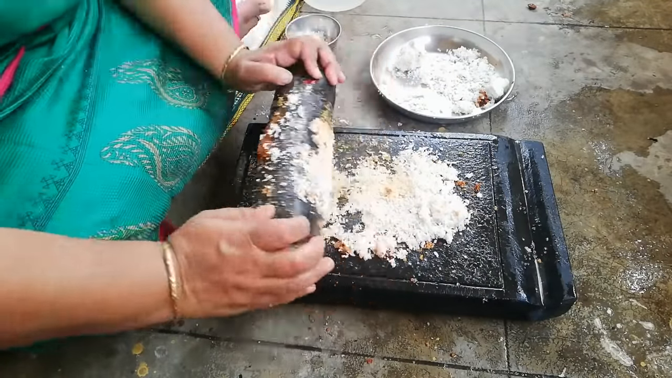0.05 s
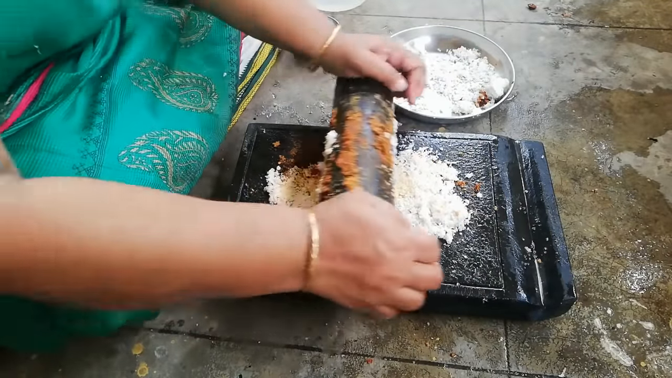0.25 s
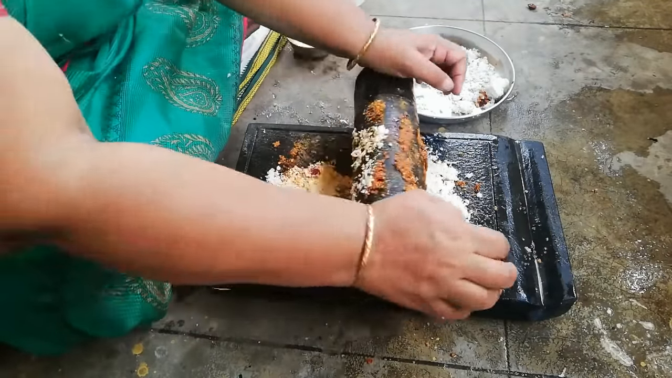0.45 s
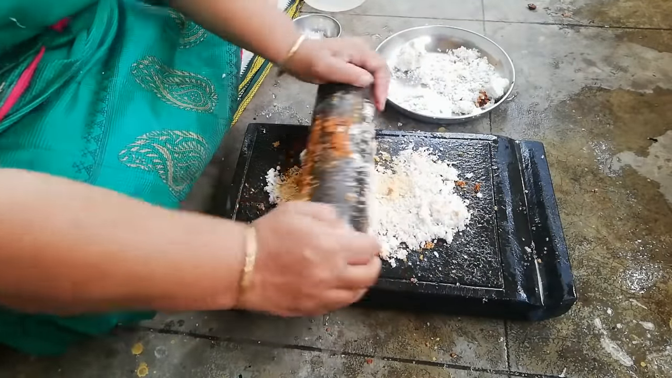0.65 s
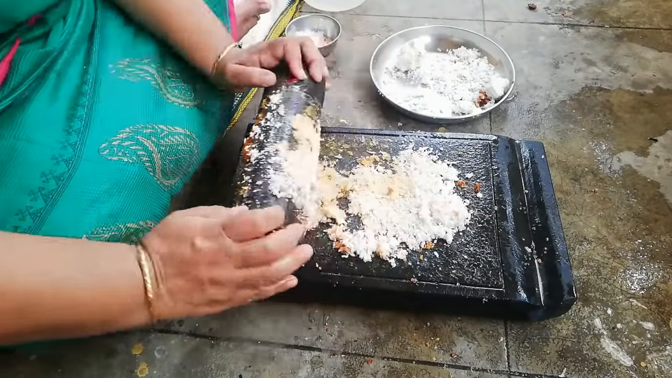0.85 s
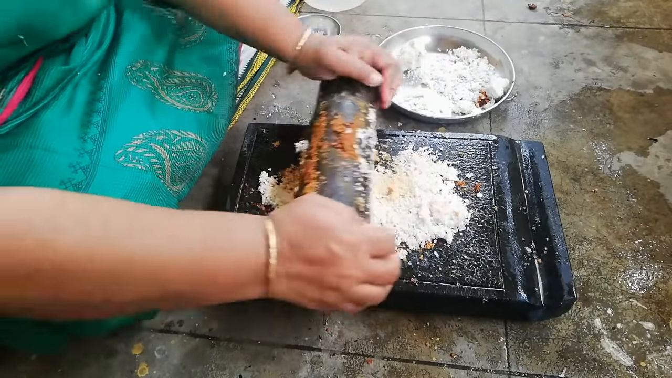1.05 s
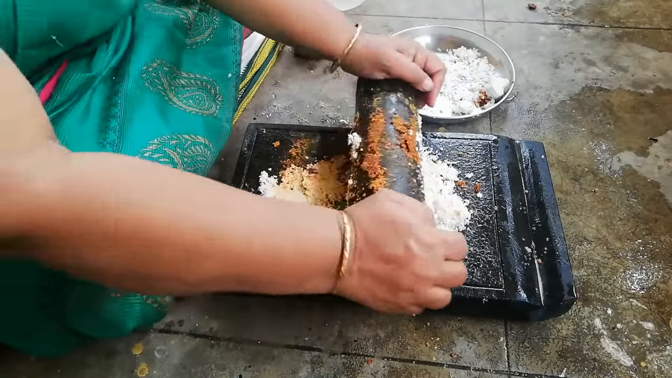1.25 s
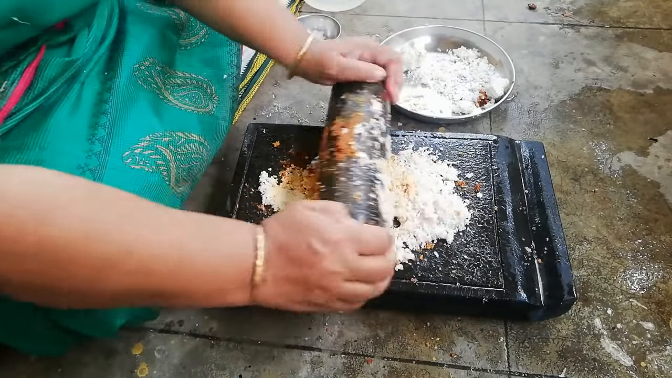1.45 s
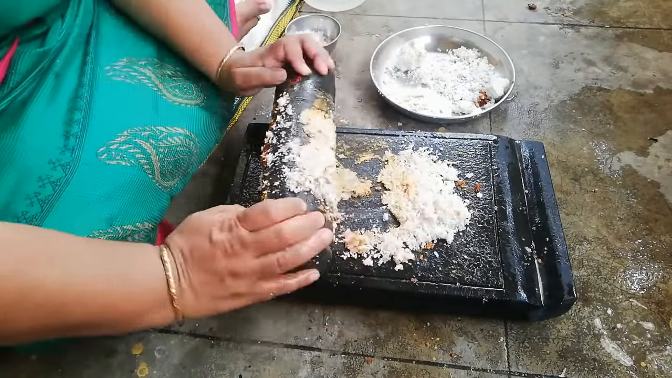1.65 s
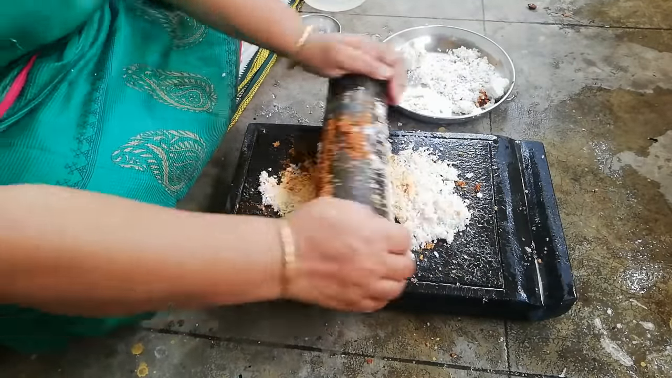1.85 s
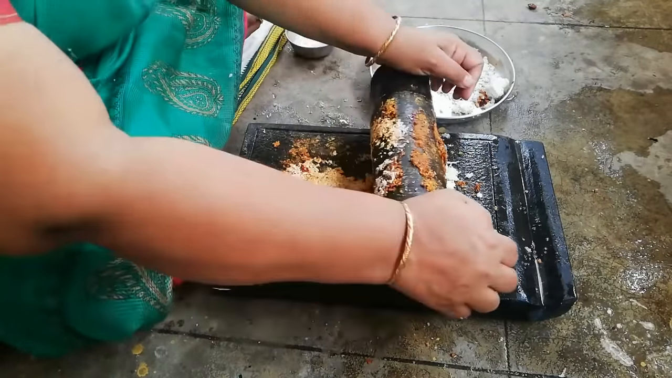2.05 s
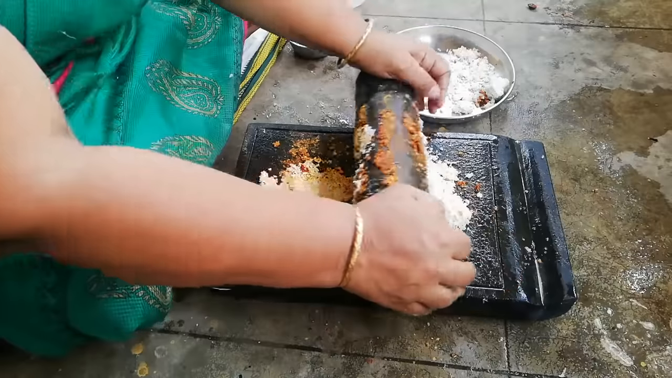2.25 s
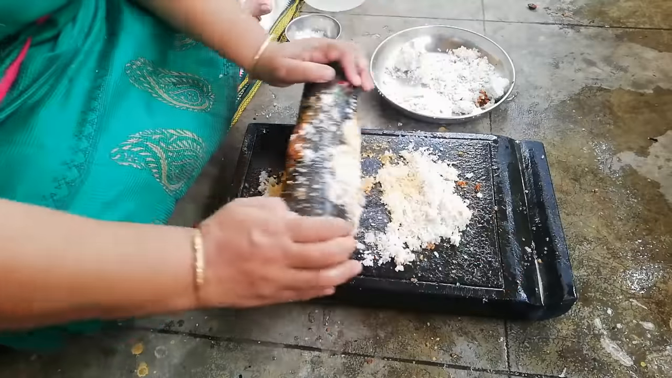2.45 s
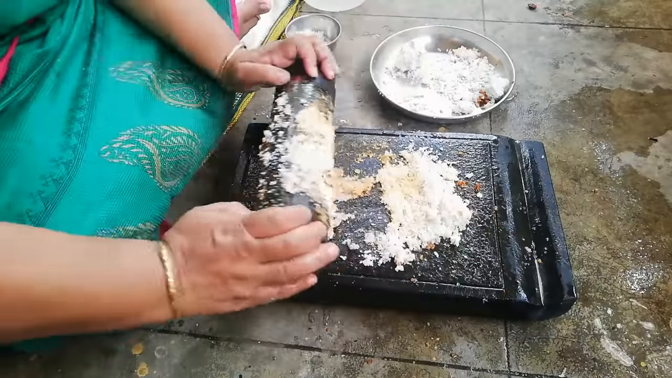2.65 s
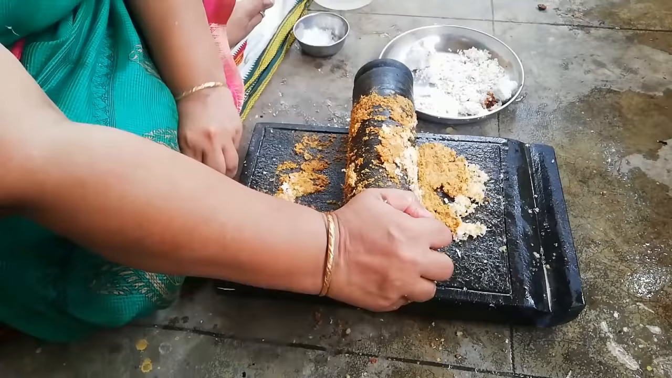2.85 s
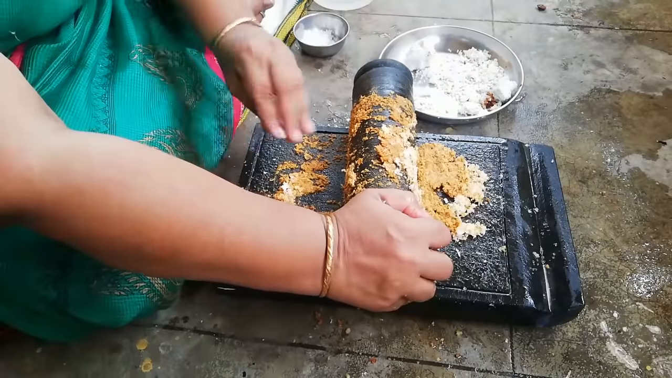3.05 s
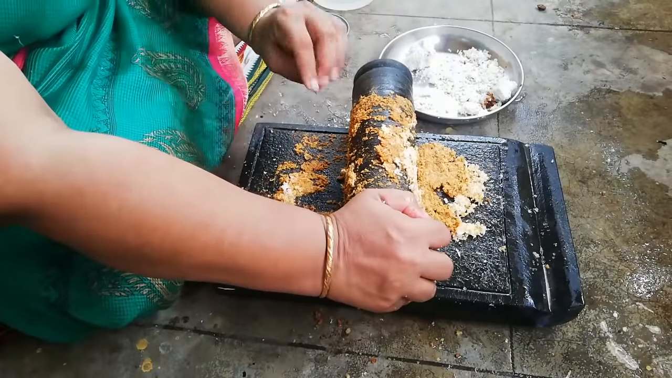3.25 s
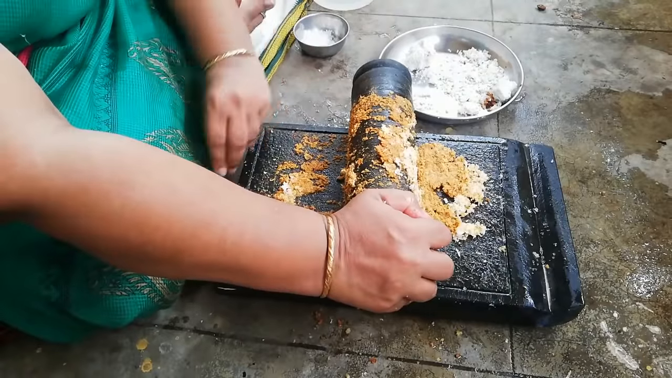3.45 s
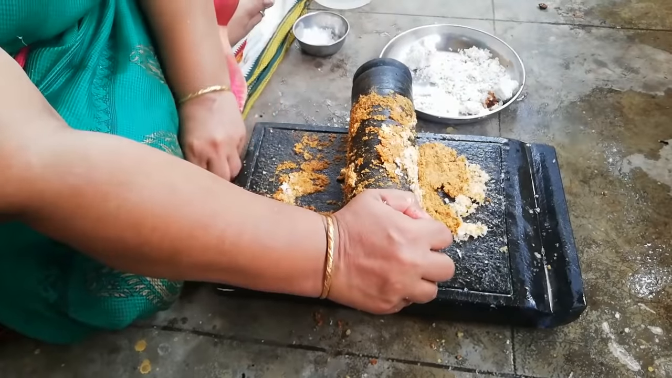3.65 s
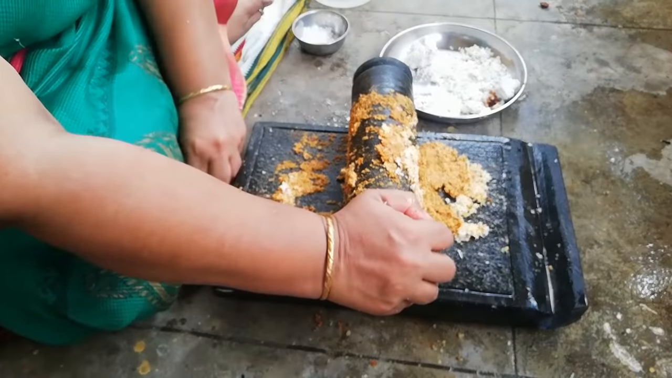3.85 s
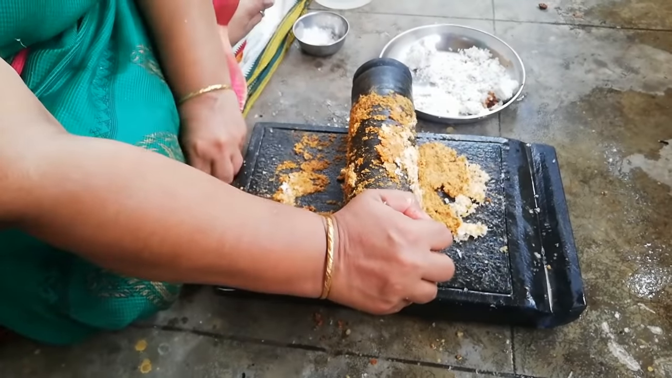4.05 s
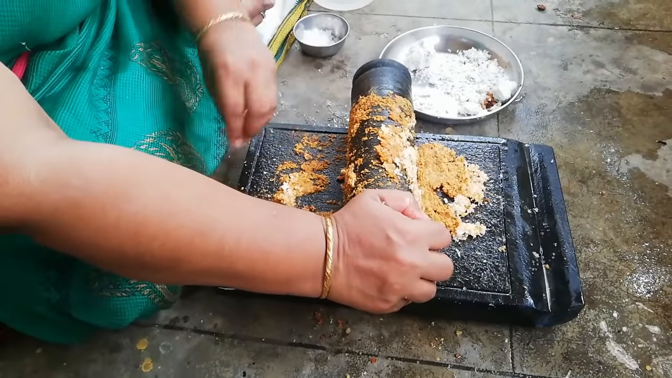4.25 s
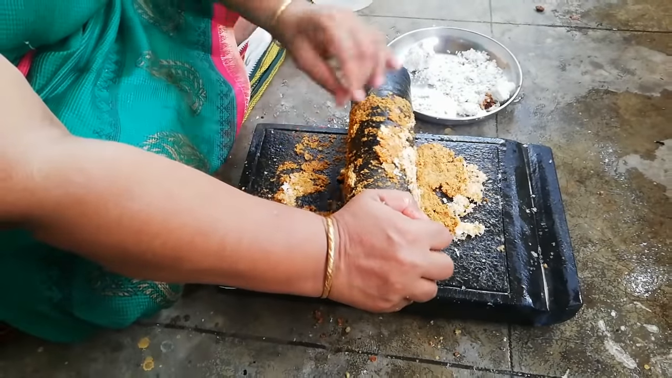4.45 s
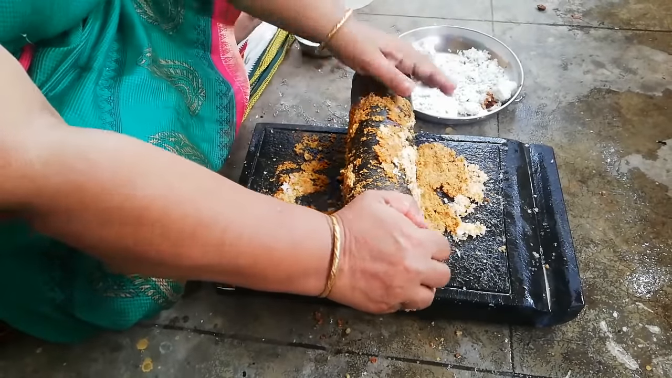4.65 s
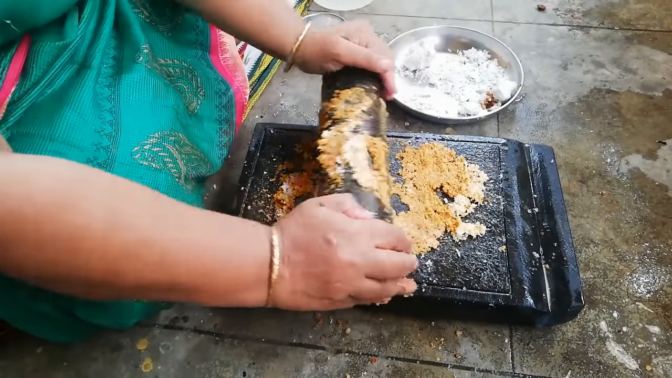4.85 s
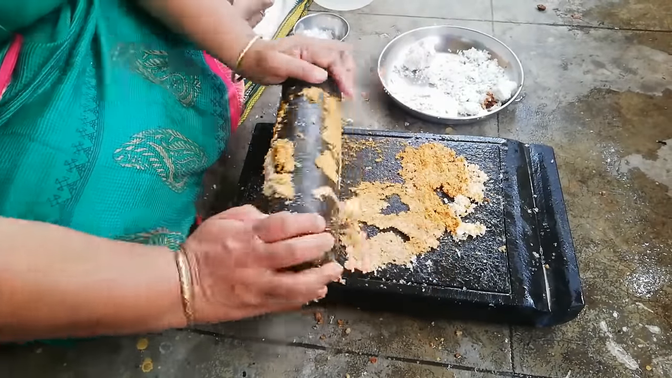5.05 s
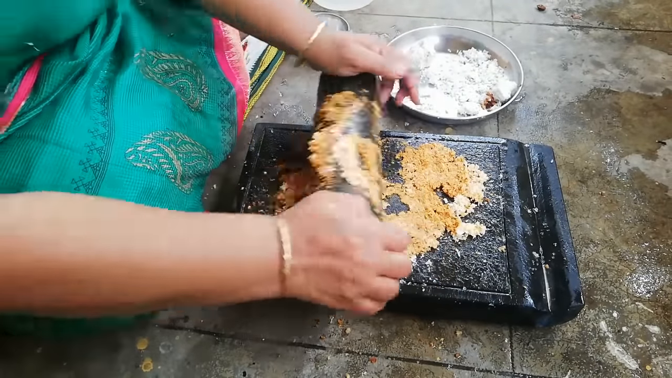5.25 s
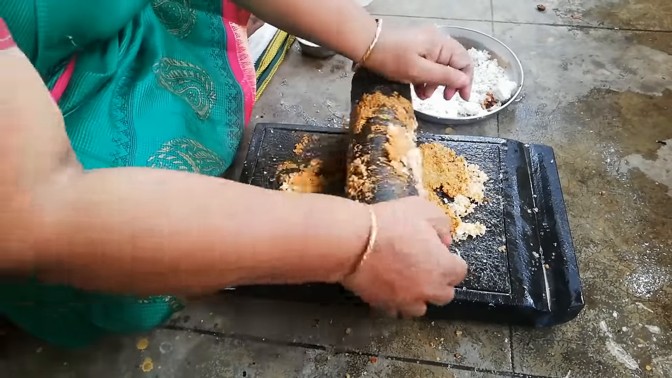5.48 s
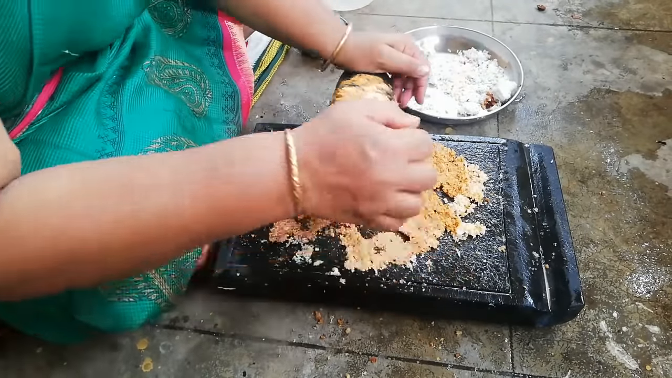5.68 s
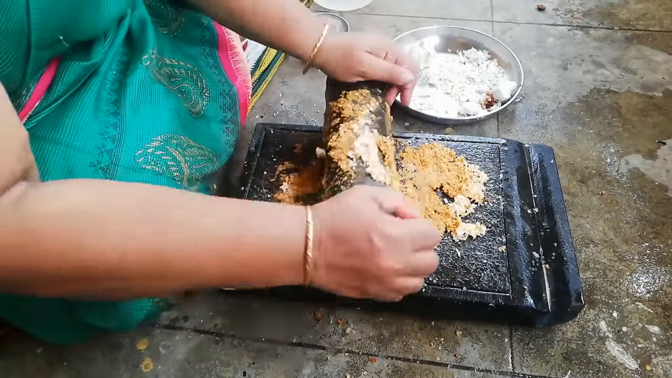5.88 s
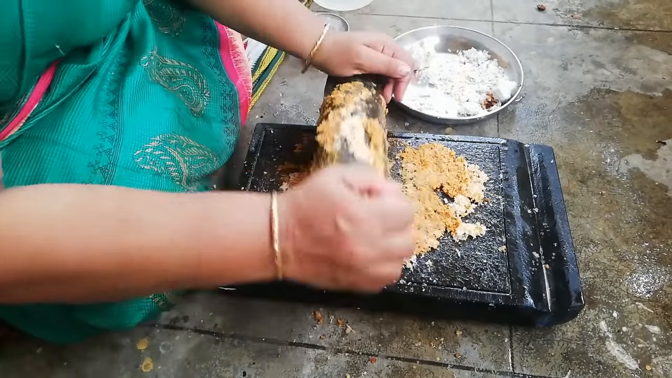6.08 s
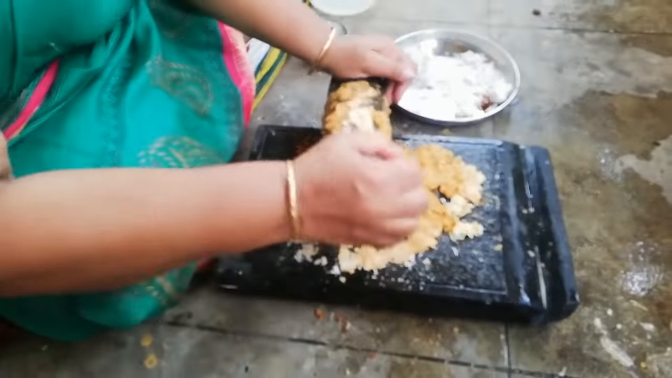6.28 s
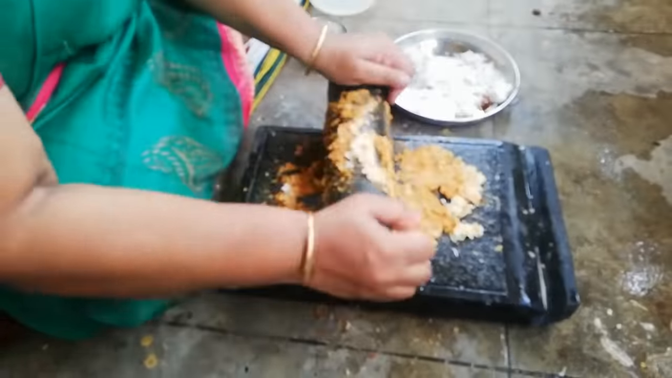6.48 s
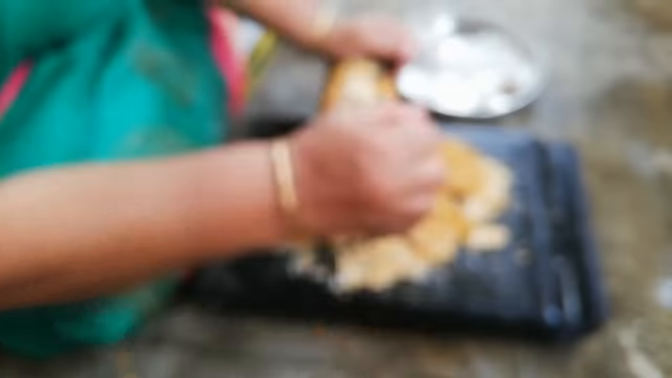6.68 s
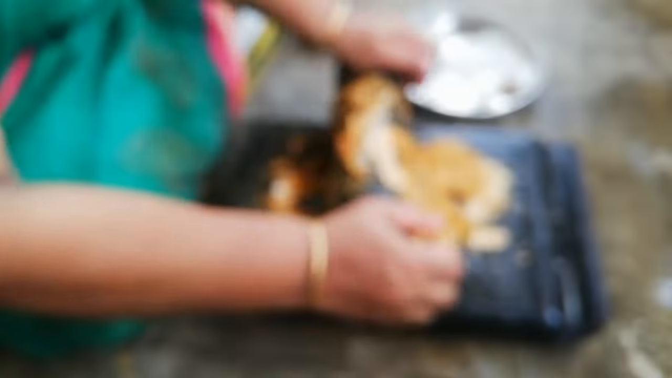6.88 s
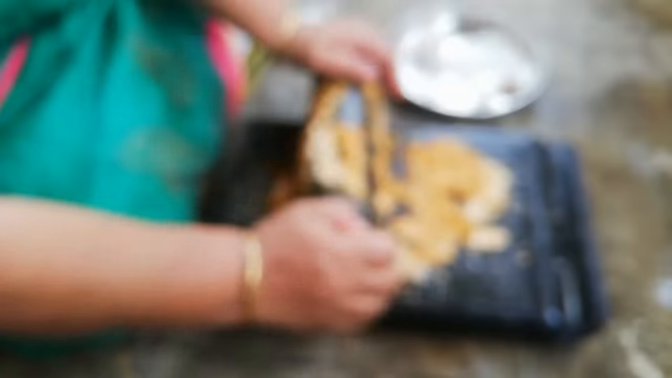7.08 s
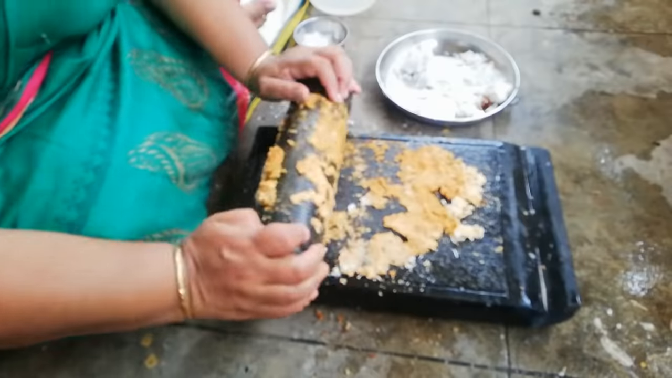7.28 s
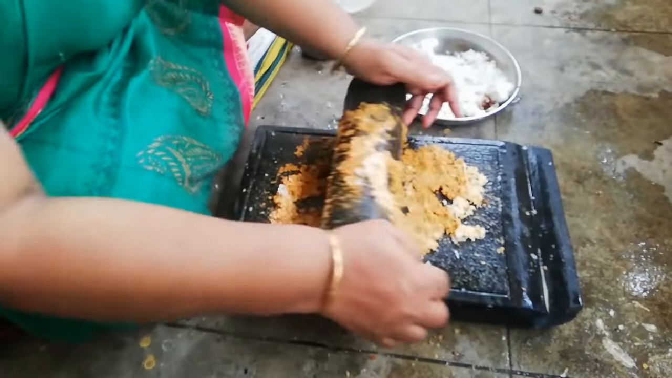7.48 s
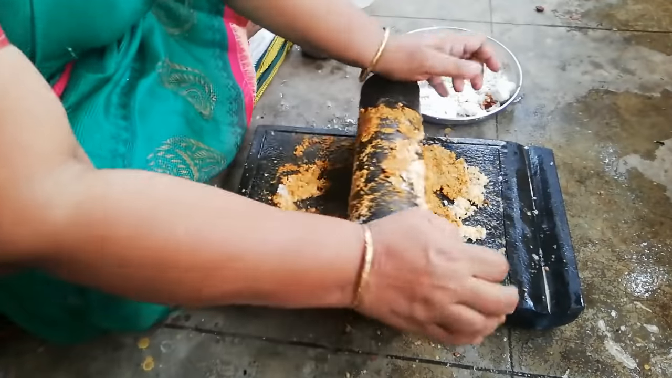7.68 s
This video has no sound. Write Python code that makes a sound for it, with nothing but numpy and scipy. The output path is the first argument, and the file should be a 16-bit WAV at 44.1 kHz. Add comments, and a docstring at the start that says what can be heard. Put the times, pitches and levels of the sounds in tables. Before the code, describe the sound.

A close stereo microphone in a small hard kitchen catches a stone roller working moist coconut pulp on a stone slab, nearer the right. From 0 to 2.8 seconds, quiet gritty crunches come and go with each stroke; a hard stone clack lands at 0.3, a rough ringing scrape at 1.1 to 1.2, and lighter knocks near 2.4, over soft low rumbles. From about 2.9 to 4.7 the grinding stops, leaving steady airy noise and a wavering low motor hum, with one tiny tick around 4. Wet, brighter crunching resumes near 4.9. The roller thumps down at 5.8 and 6.2 with bassy thuds and pulp splats, then much harder at 6.5 and 6.8, clacking, ringing and booming. A brittle double crack snaps on the left at 6.7. Softer crunches and small scrapes continue to about 7.7.

```python
"""Coconut paste crunches as a stone roller is pushed to and fro over a stone slab on a kitchen floor.
Bare stone scrapes and rings the roller; it is thumped down four times; a brittle piece cracks.
Random clicks make crunch and scrape; dying modes make stone and the bass boom of the small hard room.
Steady noise and wavering tones make the kitchen air and a motor's hum. The slab is nearer the right port."""
import sys
import numpy as np
from scipy import signal
from scipy.fft import rfft, irfft, next_fast_len
from scipy.io import wavfile
from scipy.ndimage import uniform_filter1d

SR = 44100
rng = np.random.default_rng(int(sys.argv[2]) if len(sys.argv) > 2 else 0)


def wav_record(signal):
    """Record a signal, one row per channel, as 16-bit PCM in the file named by sys.argv[1]."""
    frames = np.transpose(np.atleast_2d(signal))
    bounded = np.clip(frames, -1, 1)
    # unit amplitude maps onto the largest positive 16-bit level
    quanta = np.round(bounded * 32767).astype(np.int16)
    wavfile.write(sys.argv[1], SR, quanta)


N = 340440  # samples


def amp(db):
    """Decibels to gain."""
    return 10 ** (np.asarray(db) / 20)


def evened(x):
    """Scales to rms 1."""
    return x / np.sqrt(np.mean(x ** 2) + 1e-20)


def read(points, hz):
    """Reads a table on a log-frequency axis."""
    f, value = np.transpose(points)
    return np.interp(np.log(hz + 1), np.log(f + 1), value)


def add(mix, s, sound):
    """Mixes a sound in at a time."""
    part = mix[round(s * SR):][:len(sound)]
    part += sound[:len(part)]


def coloured(x, points, share=1):
    """Filters by a table of dB, scaled by share."""
    length = x.shape[-1]
    size = next_fast_len(length)
    gain = amp(share * read(points, np.fft.rfftfreq(size, 1 / SR)))
    return irfft(rfft(x, size) * gain, size)[..., :length]


def ring(modes, seconds):
    """Impulse response of exponentially dying modes, peak 1."""
    t = np.arange(round(seconds * SR)) / SR
    out = sum(sign * amp(db - 60 * t / t60) * np.sin(2 * np.pi * hz * t) for hz, db, t60, sign in modes)
    return out / abs(out).max()


def grit(per_s, spread_db):
    """Random clicks of both signs, a few large, rms 1."""
    size = amp(spread_db * np.minimum(rng.exponential(1, N), 4))
    sign = rng.choice([-1., 1.], N)
    return evened(size * sign * (rng.random(N) < per_s / SR))


def swells(rows):
    """Power sum of swells, each rising to its peak and falling away evenly in dB."""
    t, power = np.arange(0, N + 64, 64) / SR, 0
    for s, rise_s, fall_s, db in rows:
        below_peak_db = 20 * np.where(t < s, (s - t) / rise_s, (t - s) / fall_s)
        power = power + amp(db - below_peak_db) ** 2
    return uniform_filter1d(np.interp(np.arange(N) / SR, t, np.sqrt(power)), 200)


# crackle colour of pulp: (frequency [Hz], level [dB])
PASTE_COLOUR = [(880, -3), (1500, -2.5), (1660, -14), (1770, -48), (1920, 1.5), (2480, -3), (3470, -2),
                (5560, 1), (6320, 4), (7400, 1.5), (10300, 3), (11800, 0), (15800, -14)]
# pulp crushed under roller: (peak time [s], rise per 20 dB [s], fall per 20 dB [s], level [dB],
#                             wetness as treble tilt [dB])
CRUNCHES = [(0.0, .05, 0.05, -50.5, -4), (0.104, 0.14, 0.13, -60.5, 2), (0.198, 0.035, 0.042, -50, 12),
            (0.245, 0.084, 0.06, -55, -6), (0.37, 0.051, 0.044, -55, 8), (0.615, 0.14, 0.094, -56.5, 3),
            (0.735, 0.047, 0.047, -57.5, -3), (0.8, 0.073, 0.079, -54, 2), (1.06, 0.059, 0.16, -63, 17),
            (1.14, 0.086, 0.15, -60, -20), (1.225, 0.46, 0.034, -49.5, -34), (1.456, .06, 0.071, -54, 2),
            (1.56, 0.072, .2, -54, 8), (1.83, 0.17, 0.22, -55.5, 24), (1.93, 0.14, 0.18, -56.5, -1),
            (2.045, .05, 0.088, -57, 2), (2.27, 0.23, 0.25, -59.5, 6), (2.42, 0.048, .1, -58.5, 11),
            (2.52, 0.14, 0.17, -57, 2.5), (2.77, 0.094, 0.067, -59, 5), (2.84, 0.21, 0.0094, -53.5, 22),
            (4.876, 0.17, 0.086, -54.5, 15), (4.995, 0.11, .12, -51, 38), (5.182, 0.11, .3, -60, 5),
            (5.282, 0.13, 0.16, -53, 25), (5.388, 0.25, 0.077, -54, 7), (5.55, .15, 0.23, -65, 14),
            (5.615, .03, .04, -62, 25), (5.915, 0.15, .08, -51, 27), (6.22, 0.1, 0.088, -48.5, 20),
            (6.53, 0.038, 0.066, -49, 6), (6.862, 0.084, 0.06, -48, -1), (7.03, 0.099, 0.24, -58.5, 2),
            (7.22, 0.21, 0.12, -51, 30), (7.361, 0.24, 0.32, -57, 2.5), (7.53, 0.23, 0.1, -52, 11),
            (7.606, .1, 0.04, -68, 8), (7.72, 0.085, .1, -60, 6)]
# roller meets slab; also played by stone() and boom(): (time [s], slab body [dB], slab edge [dB],
#   roller ring [dB], roller tick [dB], roller pings [dB], paste splat [dB],
#   splat wetness as treble tilt [dB], thud [dB])
KNOCKS = [(0.23, -70, -65, -85, -47, -42, -55, -16, -60),
          (0.281, -31, -12.5, -33.5, -59, -56, -70, -3, -32),
          (0.691, -48.5, -43, -66, -58, -62, -68, 0, -42),
          (0.725, -69, -66, -55, -58.5, -54, -47.5, -10, -50),
          (0.838, -46, -38, -44, -65, -48, -54.5, -4, -34), (1.072, -74, -59, -60, -40, -50, -59, 8, -70),
          (1.118, -47, -50, -41, -34, -49, -55, 0, -45.5), (1.2, -40, -24.5, -37, -42, -32, -55, -12, -53),
          (1.525, -55, -45, -48.5, -59, -65, -78, 2, -49.5), (1.919, -50, -43, -45, -55, -49, -55, 3, -41),
          (1.974, -46, -53, -43, -61, -47, -83, 0, -40),
          (2.416, -42.5, -32.5, -46, -33.5, -53, -55.5, -4, -38),
          (2.79, -67, -42.5, -56, -53, -55, -62, 2, -50), (3.983, -57, -44, -64, -73, -71, -74, 7, -53),
          (4.974, -70, -50, -67, -67, -54, -66, 24, -41.5),
          (4.993, -65, -58, -55, -65, -60, -53.5, 29, -31.5), (5.345, -64, -45, -59, -58, -48, -79, 0, -48),
          (5.771, -47, -56, -39.5, -67, -47.5, -70, 4, -50),
          (5.84, -35.5, -32, -39, -66, -47, -34, -7.5, -15.5),
          (5.875, -55, -50, -43, -57, -56, -39.5, 2, -50), (6.104, -43, -44, -70, -67, -67, -77, 2, -57),
          (6.162, -25.5, -23, -35, -41, -53, -29.5, -7, -13), (6.41, -58, -47, -41, -61, -64, -63, 4, -34),
          (6.488, -10, -6.5, -20, -30, -27.5, -30.5, -11, -15),
          (6.812, -8.5, 1.5, -11.5, -24.5, -33, -32, 0, -16),
          (7.514, -48, -54, -43, -39, -46, -58, -5, -46), (7.6, -46, -50, -41, -41, -47, -54, 6, -58)]
SQUEEZE_T60_S, BURST_T60_S, TRICKLE_SHARE = 0.019, 0.0043, 0.53
TRICKLE_T60_S, TRICKLE_S_PER_DB, TRICKLE_MIN_S = 0.11, -0.094, .05  # at -55 dB; louder is shorter


def paste():
    """Dense crackle of crushed pulp; wet paste sounds brighter; each knock splats it."""
    crackle = coloured(grit(per_s=7000, spread_db=2.5), PASTE_COLOUR)
    dull = evened(coloured(crackle, [(5000, -6.0), (9000, -17.5)]))
    bright = evened(coloured(crackle, [(5000, -13.5), (9000, -5)]))
    flutter = amp(2.3 * evened(uniform_filter1d(rng.standard_normal(N), 500)))

    # wetness splits each crunch's power between dull and bright
    low_rows = [(*row, db - 10 * np.log10(1 + amp(2 * wet_db))) for *row, db, wet_db in CRUNCHES]
    high_rows = [(*row, db - 10 * np.log10(1 + amp(-2 * wet_db))) for *row, db, wet_db in CRUNCHES]
    low, high = flutter * swells(low_rows), flutter * swells(high_rows)

    t = np.arange(-.04, .3, 1 / SR)
    for s, *_, splat_db, wet_db, _ in KNOCKS:
        # squeezed just before contact, then burst and trickle
        trickle_t60_s = max(TRICKLE_T60_S + TRICKLE_S_PER_DB * (splat_db + 55), TRICKLE_MIN_S)
        burst = amp(-60 * abs(t) / BURST_T60_S)
        trickle = TRICKLE_SHARE * amp(-60 * abs(t) / trickle_t60_s)
        shape = amp(splat_db) * np.where(t < 0, amp(60 * t / SQUEEZE_T60_S), burst + trickle)
        add(low, s + t[0], shape * amp(-wet_db / 2))
        add(high, s + t[0], shape * amp(wet_db / 2))
    return low * dull + high * bright


# mode families: slab body, slab edge, roller ring, roller tick, roller pings;
# each a list of (frequency [Hz], level [dB], t60 [s], polarity)
STONE_MODES = [
    [(340, 10, .06, 1), (704, -12, .1, 1), (748, -8, .2, 1), (772, -2, .22, 1), (785, 0, .07, 1),
     (845, -6, .1, 1)],
    [(680, -6, .03, 1), (940, -3, .03, 1), (1000, -2, .04, 1), (1095, -3, .04, 1), (1190, -4, .03, 1),
     (1280, -5, .04, 1), (1400, -4, .04, 1), (1447, -1, .08, 1), (1520, -3, .04, 1), (1580, -5, .03, 1)],
    [(1772, 0, .17, 1), (1808, 0, .24, 1)],
    [(3400, 0, .035, 1)],
    [(3770, 0, .22, 1), (4510, -5, .12, 1), (6290, -8, .06, 1)],
]
# bare stone slides on stone: (peak time [s], rise per 20 dB [s], fall per 20 dB [s],
#                              contact level [dB], roller singing re contact [dB])
SCRAPES = [(0.275, 0.026, 0.15, -44.5, -16), (0.69, 0.096, 0.03, -54.5, 1), (0.85, 0.024, 0.037, -52, -9),
           (1.129, 0.025, 0.071, -37.5, 3), (1.209, 0.075, 0.031, -33, -2.5),
           (1.46, .03, 0.089, -62.5, 7.5), (1.99, 0.12, 0.038, -51, 0.5), (2.3, 0.059, 0.34, -70, 6),
           (2.419, 0.042, 0.019, -43.5, -3), (5.388, 0.074, 0.063, -51, 2.5), (5.55, .06, 0.37, -54.5, -7),
           (5.76, 0.12, 0.17, -50, -2), (6.115, 0.037, 0.18, -49.5, -8), (6.31, .03, 0.17, -60.5, 2.5),
           (6.432, 0.034, 0.044, -31.5, -5), (6.745, 0.2, 0.09, -48, -4), (6.989, 0.3, 0.16, -45, -2),
           (7.53, 0.11, 0.027, -52, -1), (7.606, 0.034, .06, -56.5, 6), (7.72, 0.075, .05, -52, -9)]
# per family: (share under a scrape [dB])
SCRAPE_DB = [-12.5, -7.5, 0.5, -19, -13]
# per family: (contact length [samples]); slab is met through more pulp than roller
CONTACT_SAMPLES = [30, 34, 20, 6, 6]


def stone():
    """Slips of bare stone and knocks drive the same modes; the spot struck sets their shares."""
    coarse_rows = [row[:-1] for row in SCRAPES]
    fine_rows = [(*row, db + sing_db) for *row, db, sing_db in SCRAPES]
    coarse = swells(coarse_rows) * grit(per_s=1100, spread_db=5.0)
    fine = swells(fine_rows) * grit(per_s=2000, spread_db=3.0)  # keeps the roller singing

    out = np.zeros((len(STONE_MODES), N))
    for k, modes in enumerate(STONE_MODES):
        contact = signal.windows.hann(CONTACT_SAMPLES[k])
        body = signal.oaconvolve(ring(modes, seconds=.4), contact)
        body /= abs(body).max()
        drive = amp(SCRAPE_DB[k]) * (fine if k > 1 else coarse)
        out[k] = signal.oaconvolve(drive, body)[:N] / np.linalg.norm(body)
        for row in KNOCKS:
            add(out[k], row[0], amp(row[1 + k]) * body)
    # small stones radiate no bass
    return signal.sosfilt(signal.butter(4, 620, "high", fs=SR, output="sos"), out)


# floor and room boom: (frequency [Hz], level [dB], t60 [s], polarity at the microphone)
BOOM_MODES = [(46.2, -8, 0.92, 0.4), (59.7, -27, 1, -0.27), (71.9, -12, 0.52, 0.91), (105, -12, .58, -1),
              (111.5, 0, .42, 1), (117.7, -13, .6, -1), (130.8, -6.5, 0.29, -0.83), (159.8, -13, 0.51, 0.5),
              (193.4, -19.5, 0.61, 0.42), (222.2, -14, 0.19, 0.78), (300.4, -21.5, 0.17, 0.92),
              (372, -27, 0.15, 0.74)]
# weight leans on slab, or a thump's boom swells back:
# (peak time [s], rise per 20 dB [s], fall per 20 dB [s], level [dB])
BASS_SWELLS = [(0.04, 0.096, 0.026, -45), (0.34, 0.16, 0.072, -40.5), (0.67, .1, 0.079, -43.5),
               (0.85, 0.036, .11, -69), (1.24, 0.11, 0.037, -44.5), (1.46, .03, 0.33, -47.5),
               (1.56, .2, 0.09, -44.5), (1.95, .06, 0.21, -35), (2.27, .03, 0.14, -50.5),
               (2.46, 0.077, 0.043, -36), (2.9, .15, 0.092, -52), (4.7, 0.065, .14, -55),
               (5.026, 0.028, 0.12, -39), (5.27, 0.092, .13, -50), (5.442, 0.079, .07, -43),
               (5.75, 0.26, 0.017, -47.5), (5.97, 0.043, 0.014, -41), (6.076, 0.048, .02, -42),
               (6.3, 0.063, 0.017, -35), (6.374, .04, 0.049, -33.5), (6.62, 0.024, 0.076, -39),
               (7.012, .03, 0.099, -41), (7.24, 0.18, 0.083, -41), (7.61, 0.027, 0.071, -45.5)]
THUD_LAG_S = 0.0039  # floor answers a little late


def boom():
    """Knocks and bass swells (leaning weight or a returning boom) drive the floor's and room's low modes."""
    push = swells(BASS_SWELLS) * grit(per_s=510, spread_db=5.5)
    body = ring(BOOM_MODES, seconds=0.74)
    body *= np.minimum(np.arange(len(body)) / SR / 0.0023, 1)  # heavy slab takes a moment to move
    out = signal.oaconvolve(push, body)[:N] / np.linalg.norm(body)
    for s, *_, thud_db in KNOCKS:
        add(out, s + THUD_LAG_S, amp(thud_db) * body)
    return out


# brittle piece cracks near the left port: (time [s], level before colour [dB])
CRACKS = [(6.716, -0.5), (6.7205, 1.5), (6.7217, -21), (6.722, -14.5), (6.7254, -9.5)]
# snap colour: (frequency [Hz], level [dB])
CRACK_COLOUR = [(1000, -57.5), (2000, -17), (3500, -7), (4400, 2), (5400, 0.5), (8300, 4.5), (12000, -1.5),
                (15800, -14)]


def cracks():
    """Sharp snaps of fast-dying random-sign noise, with a short fizz of splinters."""
    out, t = np.zeros(N), np.arange(60) / SR
    shapes = rng.choice([-1., 1.], (len(CRACKS), 60))
    envelope = np.minimum(t / .0002, 1) * amp(-60 * t / .003)
    for (s, db), shape in zip(CRACKS, shapes):
        add(out, s, amp(db) * shape * envelope)
    fizz = rng.standard_normal(480) * np.linspace(1, .5, 480)
    add(out, 6.7247, amp(-22.0) * fizz)
    return coloured(out, CRACK_COLOUR)


# kitchen noise spectrum: (frequency [Hz], relative density [dB per Hz])
AIR_COLOUR = [(12, -38), (25, -12), (70, -3), (101, -9), (150, -12.5), (300, -13.5), (380, -19),
              (1560, -23), (2400, -26), (3020, -17), (3600, -24), (7200, -25), (7950, -16.5), (8600, -21),
              (13400, -23.5), (14300, -30.5), (15800, -30)]
AIR_RMS_DB = -52
# noise likeness of the ports: (frequency [Hz], left-right correlation)
PORT_LIKENESS = [(60, 0.91), (180, 1), (550, -0.57), (1650, 0.2), (4970, -0.22), (15000, 0.074)]
# noise balance: (frequency [Hz], left over right [dB])
AIR_BALANCE = [(60, 0), (240, -1.5), (950, -2), (3770, 1.5), (15000, -5)]
# motor hum: (frequency [Hz], level before waver [dB rms])
HUM = [(96.9, -59.5), (199.2, -66.5), (296.1, -67), (398.4, -78.5)]


def air():
    """Steady kitchen noise, most alike in both ports in the bass, and a motor's wavering hum."""
    frames, hz = N // 512 + 5, np.fft.rfftfreq(2048, 1 / SR)
    a, b, c, d, patches = rng.standard_normal((frames, 1025, 5)).T
    patches = evened(uniform_filter1d(uniform_filter1d(patches, 20, 0), 8, 1))

    same = np.clip(read(PORT_LIKENESS, hz), -1, 1)[:, None]
    left = a + 1j * b
    right = same * left + np.sqrt(1 - same ** 2) * (c + 1j * d)
    z = np.array([left, right])
    z *= amp(read(AIR_COLOUR, hz)[:, None] + 0.29 * patches)
    z *= amp(np.multiply.outer([.5, -.5], read(AIR_BALANCE, hz)))[..., None]
    noise = amp(AIR_RMS_DB) * evened(signal.istft(z, nperseg=2048, noverlap=1536)[1][:, :N])

    waver = evened(uniform_filter1d(rng.standard_normal(N), 6000))
    t = np.arange(N) / SR
    # +3 dB turns rms into peak
    hum = sum(amp(db + 3.0 + 1.5 * waver) * np.sin(2 * np.pi * f * t + 0.53 * waver) for f, db in HUM)
    return noise + hum


# reverberation: (frequency [Hz], t60 [s])
ROOM_T60 = [(300, 0.57), (800, 0.16), (1800, 0.32), (4000, 0.31), (10000, 0.12)]


def room(x):
    """Sparse taps of random sign, each band dying at its own speed, other taps per port."""
    taps = np.zeros((2, SR // 2))
    at = np.arange(60, SR // 2 - 20, 20)
    at = at + rng.integers(0, 20, (2, len(at)))
    np.put_along_axis(taps, at, rng.choice([-1., 1.], at.shape), 1)
    hz, t, z = signal.stft(taps, SR, nperseg=256)
    decay = amp(-60 * t / read(ROOM_T60, hz)[:, None])
    tail = signal.istft(z * decay, SR, nperseg=256)[1]
    return signal.fftconvolve(x[None], tail / np.linalg.norm(tail[0]), axes=1)[:, :N]


# paste balance: (frequency [Hz], left over right [dB])
NEAR_BALANCE = [(60, 12), (240, -11.5), (950, -1), (3770, -19.5), (15000, -16)]
LEFT_LAG_SAMPLES = 27


def ports(x):
    """The crunch reaches the left port later and with less treble."""
    late = np.pad(x, (LEFT_LAG_SAMPLES, 0))[:N]
    return np.array([coloured(late, NEAR_BALANCE, share=.5), coloured(x, NEAR_BALANCE, share=-.5)])


# per stone family: (send to the room [dB])
WET_DB = [7.5, -6, -8.5, -4, -8]


def scene():
    """All sources with their share of the room."""
    ringing, pulp, snaps = stone(), paste(), cracks()
    wet = room(amp(WET_DB) @ ringing + amp(1.0) * pulp + amp(-20) * snaps)
    snapped = np.array([amp(3.0) * snaps, amp(-9.5) * np.pad(snaps, (20, 0))[:N]])
    rung = amp([[-1.5], [1.5]]) * ringing.sum(0)
    low = boom()
    low = np.array([low, np.pad(low, (14, 0))[:N]])  # the boom reaches the left port first
    return ports(pulp) + rung + wet + snapped + low + air()


DUCK_FROM_DB, DUCK_DB_PER_DB, RECOVER_DB_PER_S = -31, 0.21, 50.5
EDGE_HZ = 15800


def record(dry):
    """Gain control dips a little after loud sounds; peaks round off softly; then the band limit."""
    power = uniform_filter1d((dry ** 2).mean(0), 800, origin=399)  # trailing window
    power_db = 10 * np.log10(abs(power) + 1e-12)
    fall_db = np.arange(N) * RECOVER_DB_PER_S / SR
    held_db = np.maximum.accumulate(power_db + fall_db) - fall_db
    over_db = np.maximum(held_db - DUCK_FROM_DB, 0)
    duck_db = DUCK_DB_PER_DB * uniform_filter1d(over_db, 800, origin=399)
    dry = np.tanh(dry / amp(duck_db))
    band = signal.firwin(1023, EDGE_HZ, window=("kaiser", 9), fs=SR)
    return signal.oaconvolve(dry, band[None], "same")


dry = scene()
out = record(dry)
wav_record(out)
```